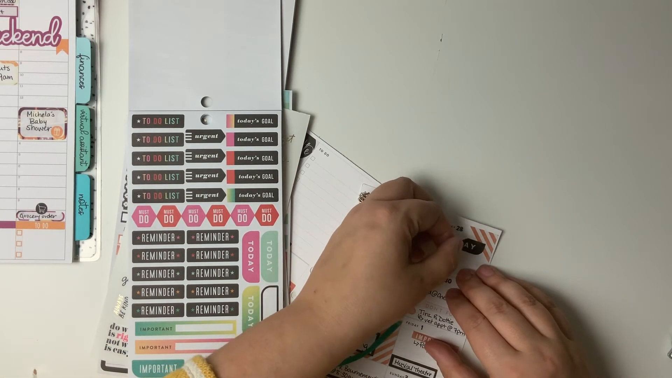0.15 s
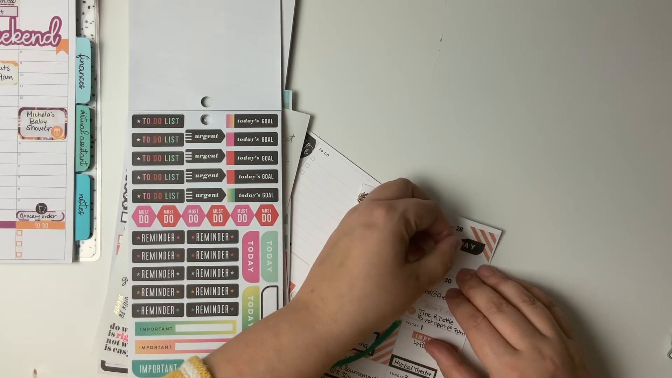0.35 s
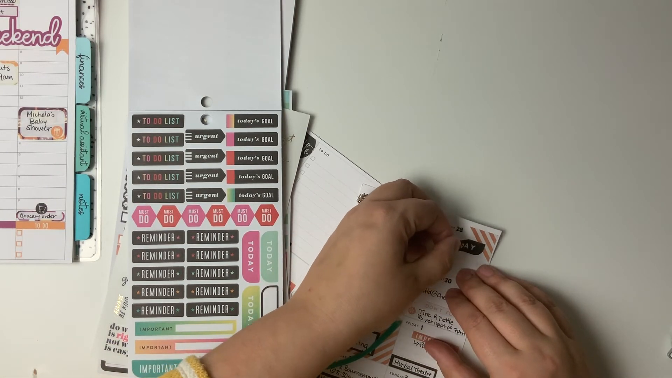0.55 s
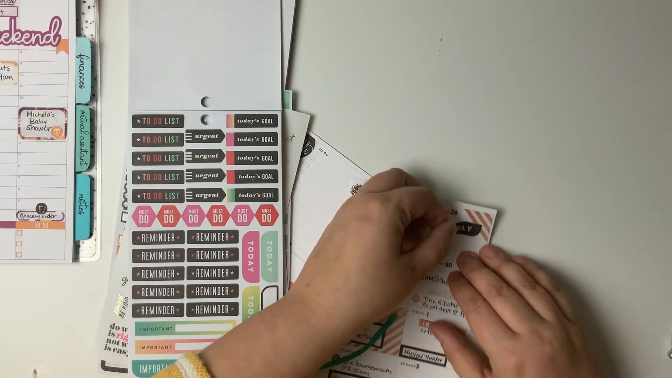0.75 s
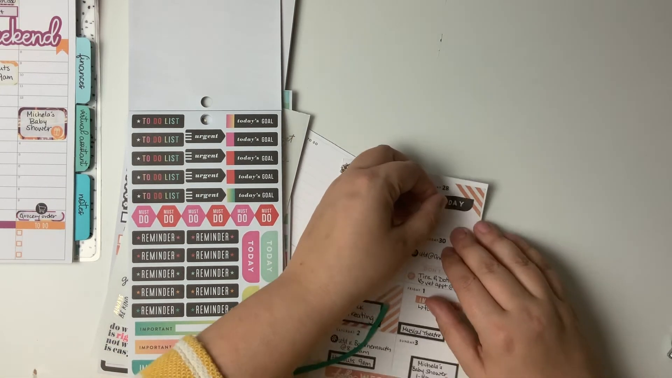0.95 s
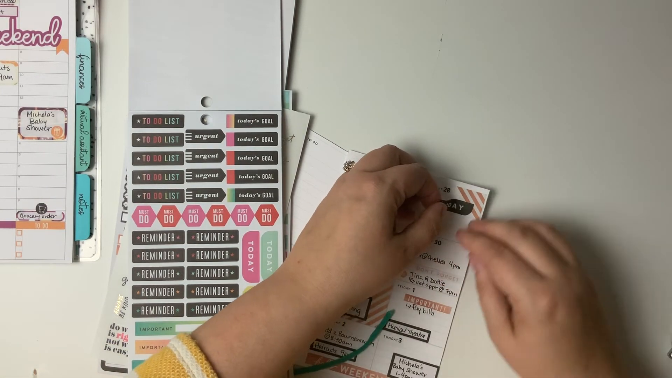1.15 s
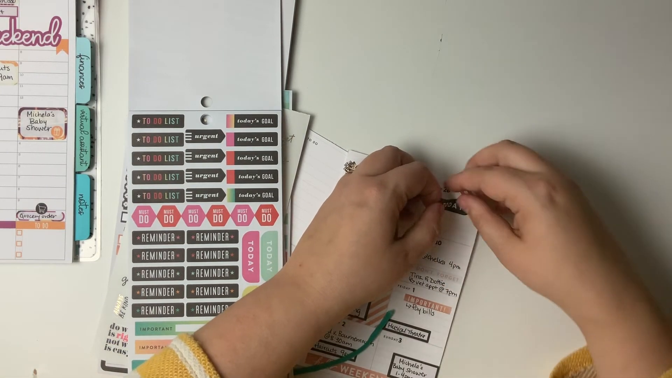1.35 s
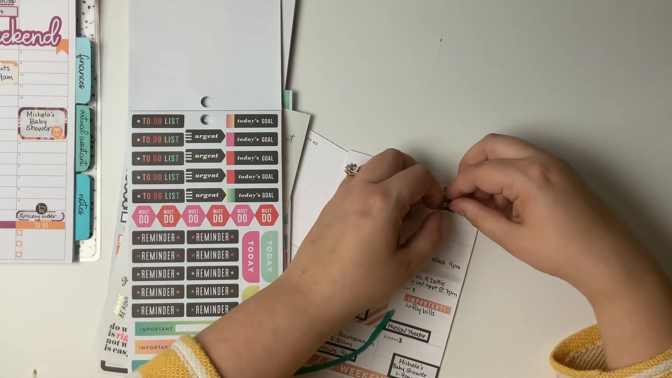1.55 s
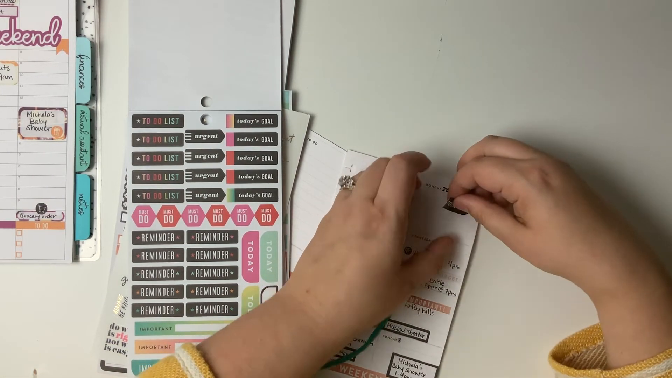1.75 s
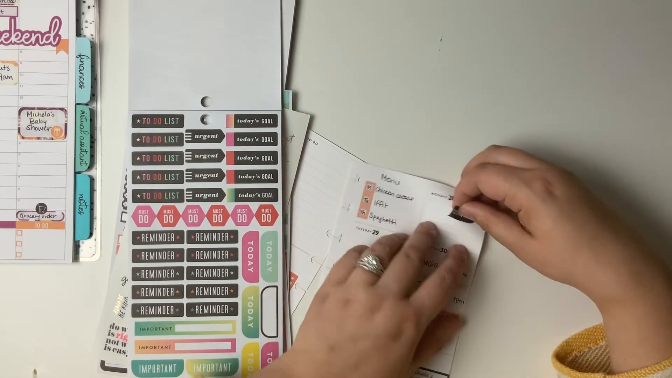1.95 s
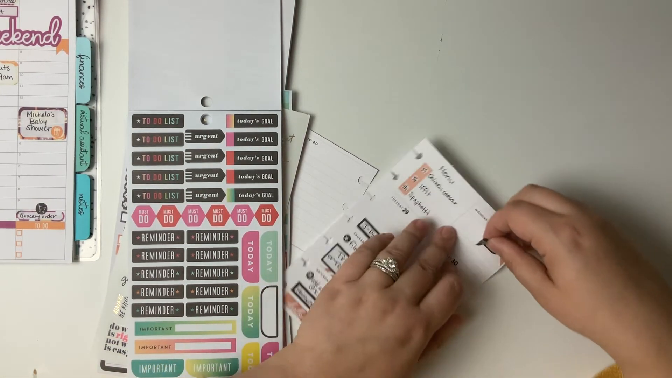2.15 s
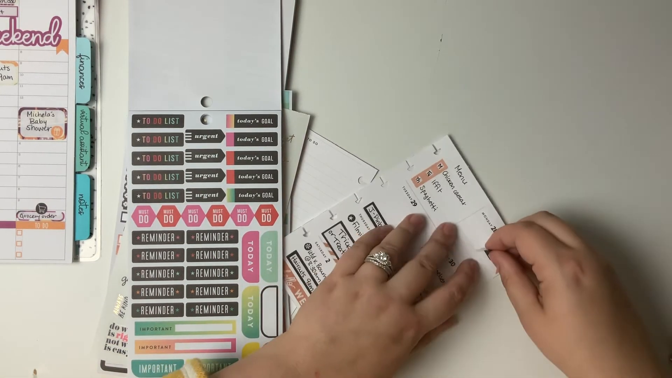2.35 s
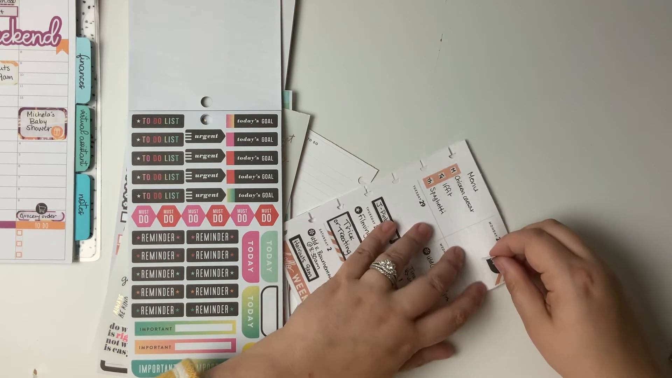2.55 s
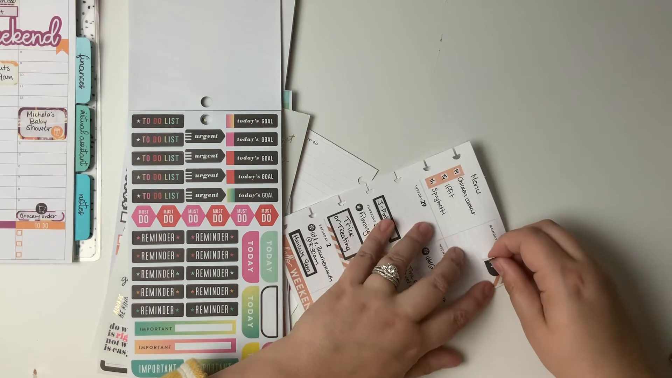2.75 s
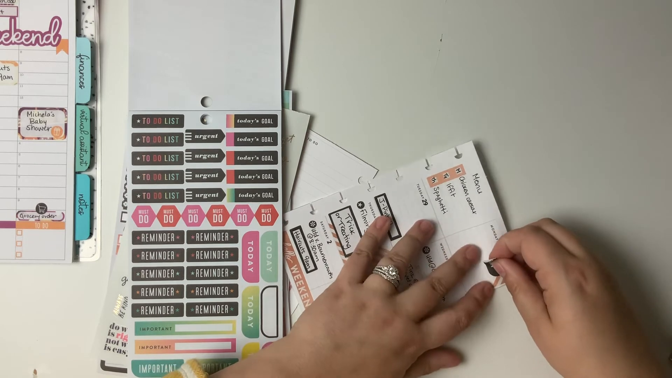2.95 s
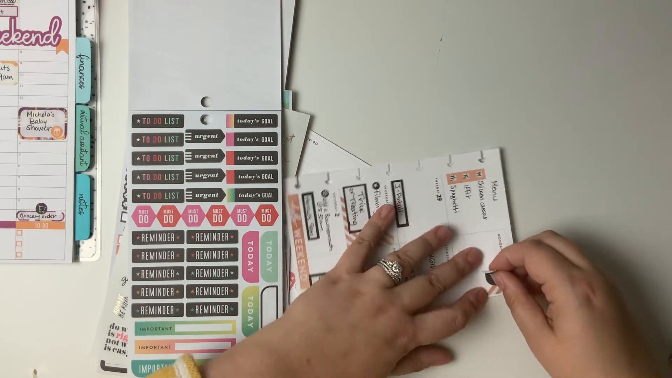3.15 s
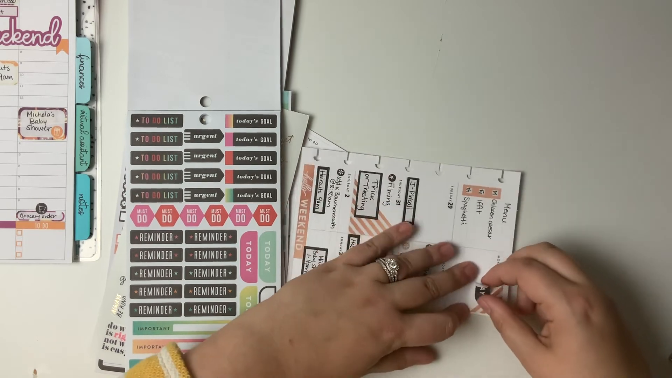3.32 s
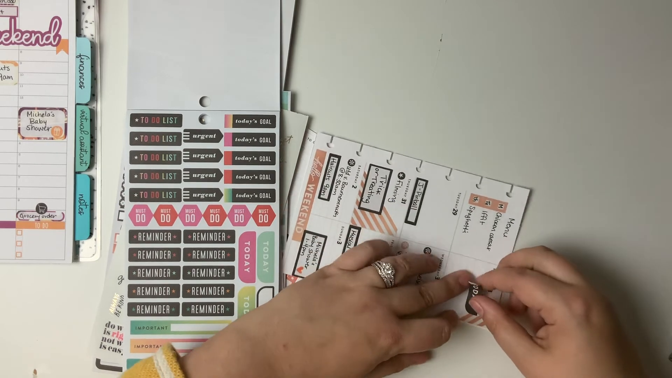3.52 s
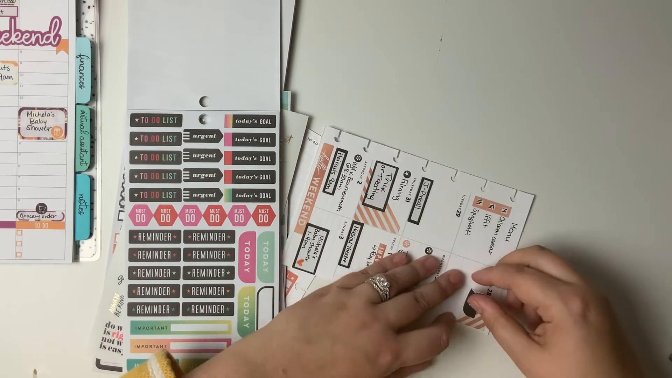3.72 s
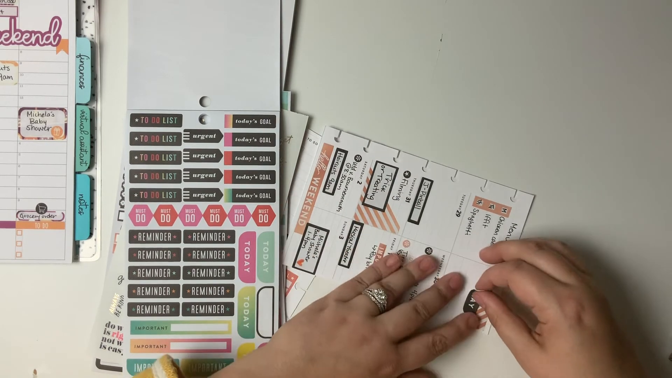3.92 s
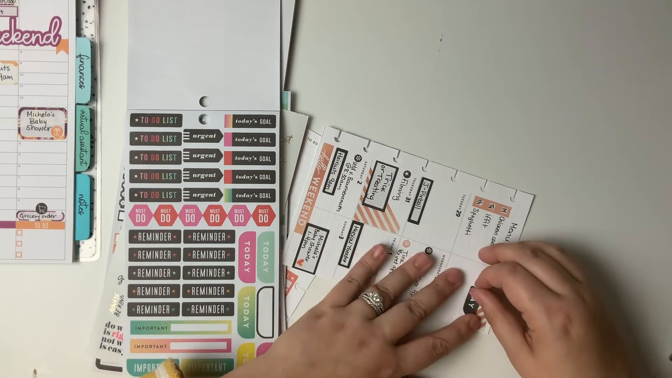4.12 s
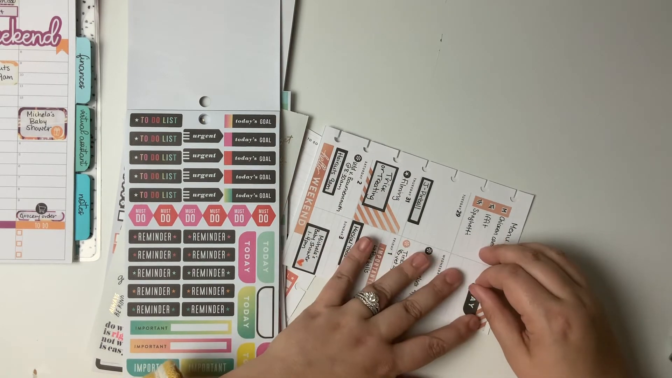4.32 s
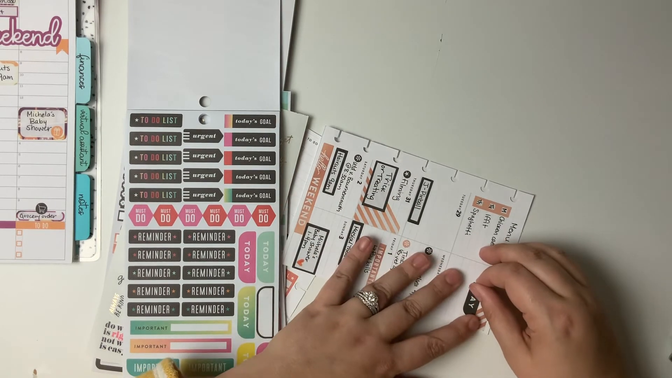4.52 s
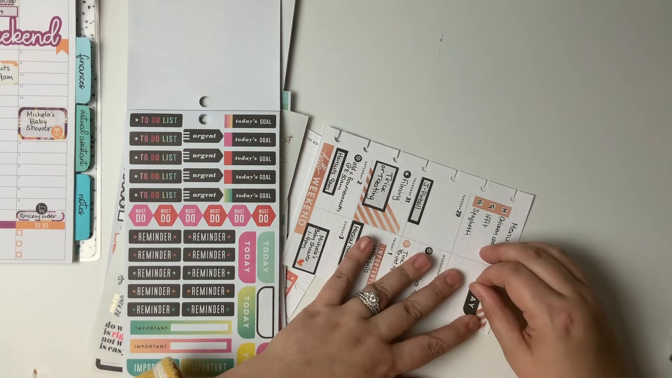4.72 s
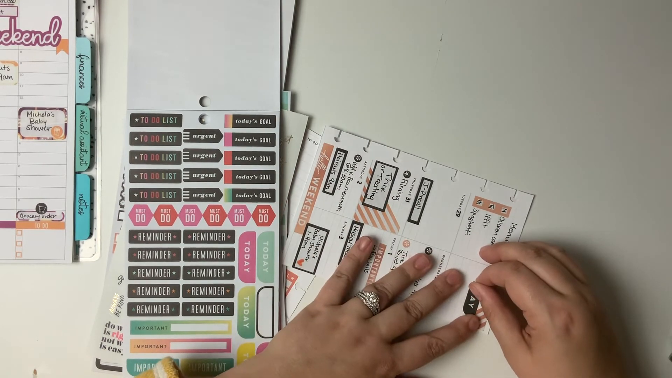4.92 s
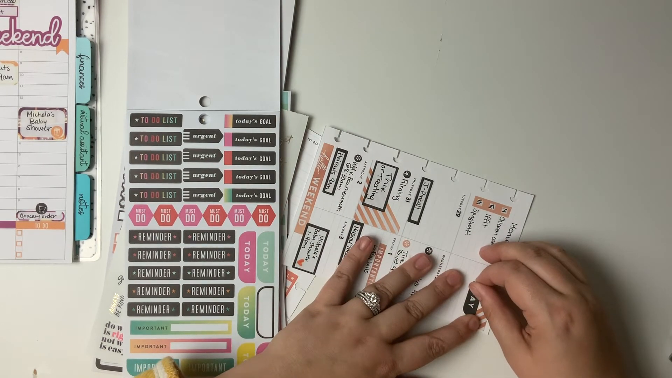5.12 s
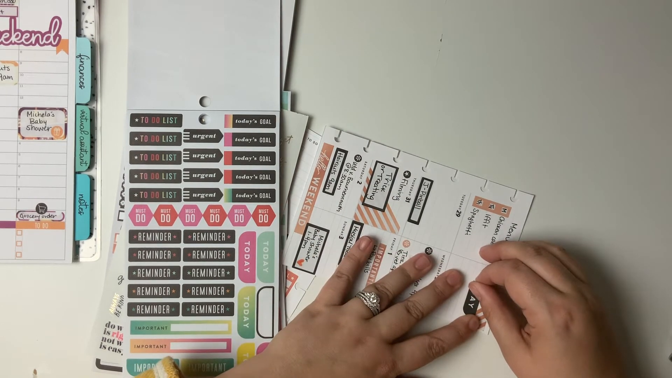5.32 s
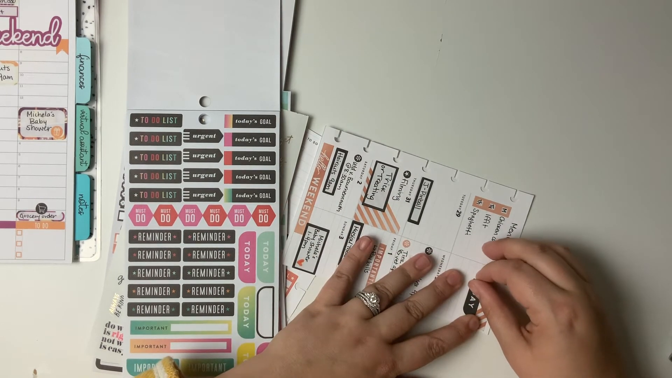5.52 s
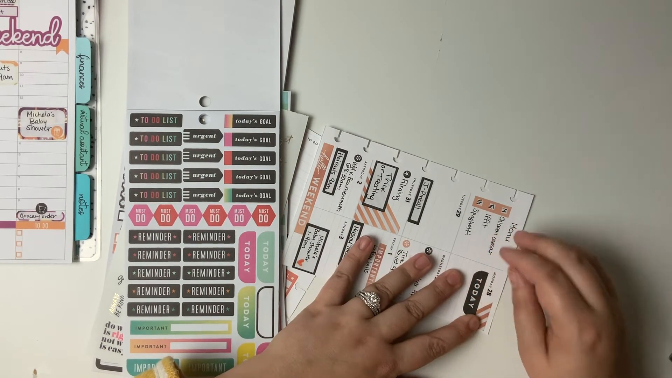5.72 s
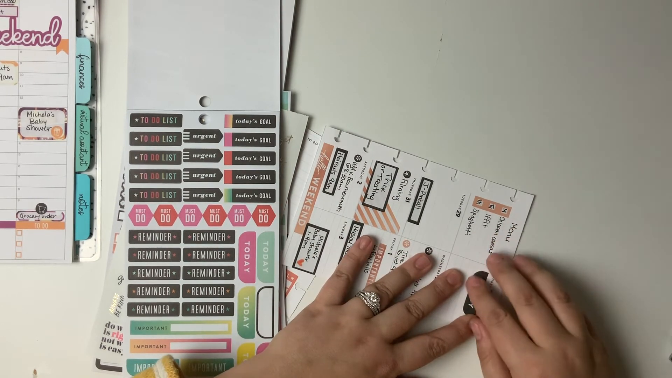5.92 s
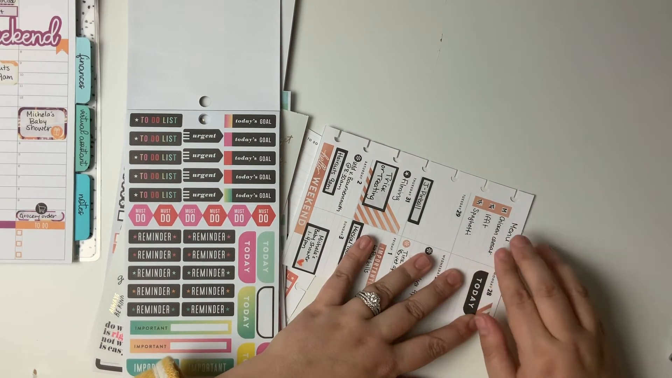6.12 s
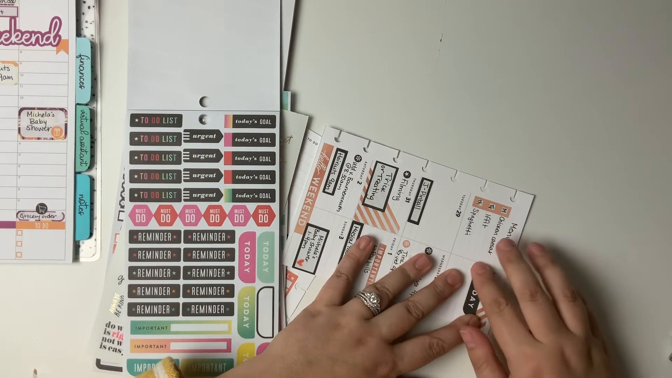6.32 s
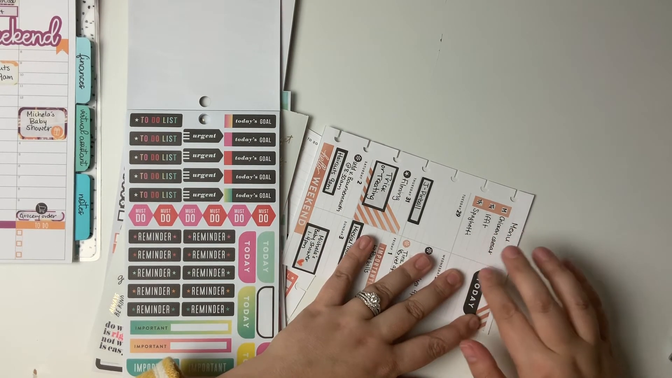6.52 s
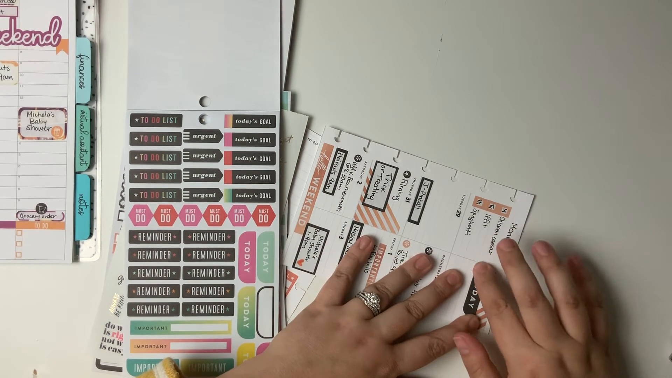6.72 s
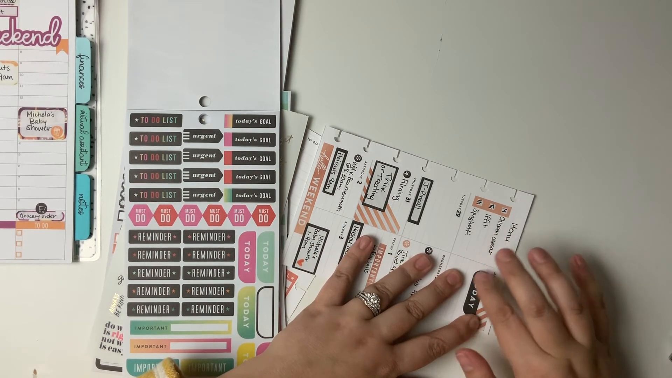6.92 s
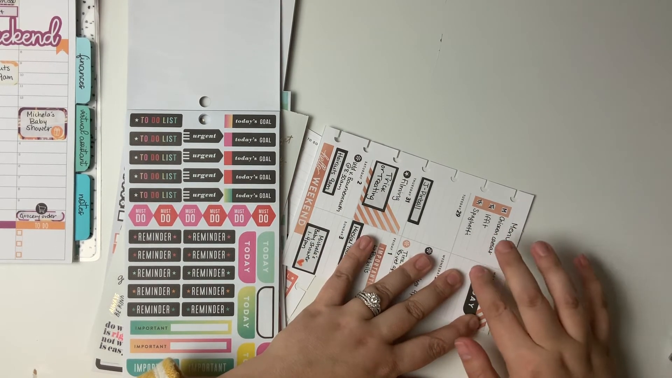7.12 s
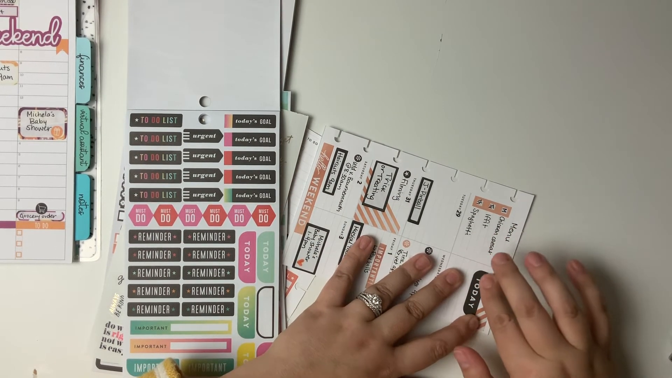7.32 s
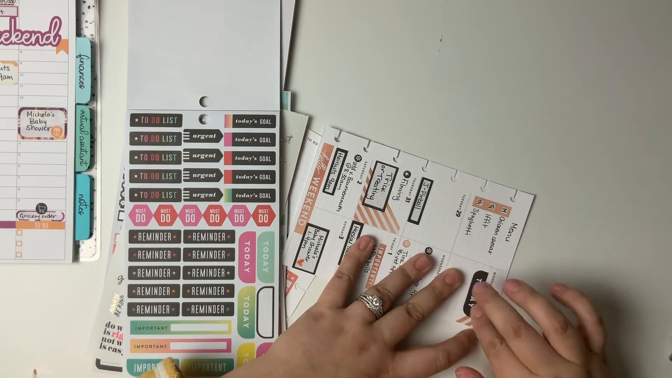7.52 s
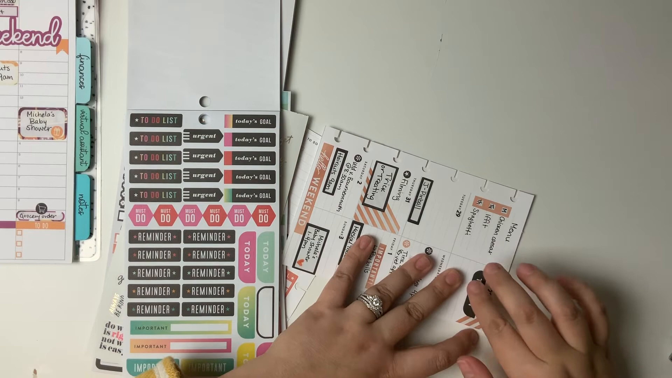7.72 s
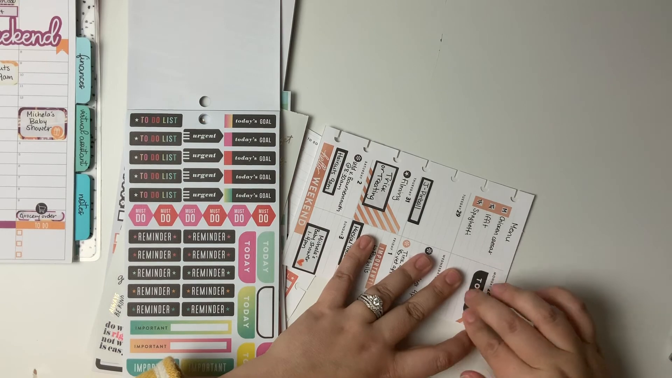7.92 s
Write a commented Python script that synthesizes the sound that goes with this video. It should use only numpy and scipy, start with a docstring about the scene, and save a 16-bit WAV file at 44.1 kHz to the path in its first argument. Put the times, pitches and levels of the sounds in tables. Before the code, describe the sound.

After almost half a second of only low room rumble, thin paper scrapes and rustles, ticking at its edges, then flops onto a desk with a sharp, loud crack. Several short shuffles follow, ending in a crisp tick. Quiet follows, with faint skin brushing; then a click and irregular soft finger thuds with light knocks and small scuffs. Dry, close stereo pickup in a small room.

```python
"""Sticker on a planner page

A planner page slides from under sticker sheets, flops onto a desk and is turned around (hissing noise).
Fingertips then pat and smooth a sticker onto it: filtered noise for skin, clicks for thuds and knocks.
Paper edges snap as sharp ticks with a papery rattle; the desk rings and sways under the pats.
Short swells of noise, low or broad, join in.
A small room with a low rumble and hum, heard through a camera's two microphone ports."""
import sys
import numpy as np
from scipy import signal
from scipy.fft import rfft, irfft
from scipy.io import wavfile
from scipy.ndimage import map_coordinates

SR = 44100
rng = np.random.default_rng(int(sys.argv[2]) if len(sys.argv) > 2 else 0)


def generate_wav(sig):
    """Save sig (samples, or channels by samples) to the path in sys.argv[1] as 16-bit PCM at SR."""
    pcm = np.round(np.clip(np.atleast_2d(sig).T, -1, 1) * 32767).astype(np.int16)
    wavfile.write(sys.argv[1], SR, pcm)


N = 355446
TIME = np.arange(N) / SR  # seconds

# pushes of the page: start t/s, length/s, fastest at share of length, hiss level/dB,
# flutter of the sheet level/dB, sheet resonance f/Hz, drag on the desk level/dB
PAGE_PUSHES = [(0.483, 0.13, .4, -57.5, -75, 4650, -81), (0.697, 0.27, 0.24, -31.5, -44.5, 4950, -52.5),
               (0.993, 0.1, 0.55, -38, -71, 5200, -55), (1.117, .05, 0.42, -40.5, -76, 5000, -58),
               (1.146, 0.21, 0.21, -55, -62.5, 4300, -54.5), (1.351, 0.15, 0.22, -45, -47.5, 4800, -62.5),
               (1.552, 0.038, 0.42, -45.5, -53, 4300, -44.5), (1.718, 0.17, 0.084, -41, -53, 3570, -54.5),
               (1.869, 0.14, 0.7, -41, -38.5, 3600, -54), (1.951, 0.27, .42, -26.5, -34.5, 3400, -48),
               (2.245, 0.16, 0.2, -33.5, -54.5, 3400, -57.5), (2.414, .27, 0.41, -37, -47, 4000, -53),
               (2.781, 0.1, 0.45, -42.5, -51, 3900, -67), (2.956, 0.12, 0.63, -43.5, -49, 4040, -44.5),
               (3.056, .23, 0.41, -34, -47.5, 4400, -53.5), (3.276, 0.12, 0.27, -36.5, -46.5, 5300, -47),
               (3.36, 0.21, 0.19, -41, -59, 5400, -58.5), (3.576, 0.079, 0.29, -42, -59, 5000, -55),
               (3.651, 0.093, 0.14, -48, -73, 5400, -65)]
# fingers brushing the page and smoothing the sticker: start t/s, length/s,
# fastest at share of length, hiss level/dB, drag on the desk level/dB
FINGER_RUBS = [(3.799, .15, .55, -39.5, -77), (4.058, 0.17, .45, -46, -87), (4.239, .1, 0.48, -48.5, -82),
               (5.549, 0.17, .5, -38.5, -44.5), (5.739, 0.18, 0.94, -38.5, -63),
               (5.948, 0.11, 0.34, -39.5, -49), (6.314, 0.16, 0.24, -46, -55.5),
               (7.369, 0.078, 0.77, -40, -40.5), (7.443, 0.18, 0.71, -43, -48.5),
               (7.806, 0.24, 0.28, -40.5, -55)]
# short swells of noise, low or broad: t/s, level/dB, half length/s, resonance f/Hz, width/Hz
SWELLS = [(0.709, -37.5, 0.013, 262, 296), (0.806, -47.5, 0.064, 2410, 810), (1.615, -40, 0.033, 216, 262),
          (5.605, -34, 0.037, 186, 132), (5.604, -36, 0.0093, 531, 696), (5.853, -43.5, 0.056, 3750, 4800),
          (6.679, -34, 0.011, 630, 280), (6.706, -30, 0.0099, 487, 240), (7.075, -32, 0.0078, 497, 257),
          (7.1, -38.5, 0.019, 437, 146), (7.901, -48, 0.046, 2220, 1300)]
# edges and nails snapping: t/s, tick peak level/dB, papery body relative to the tick/dB,
# run-up of smaller ticks/s
EDGE_SNAPS = [(0.1732, -44.5, -4, 0), (0.4991, -40.5, 1.5, 0.0073), (0.6974, -31.5, 4.5, 0.00068),
              (1.062, -21, -23, 0.0077), (1.3483, -33, -14, 0.0052), (1.5564, -27.5, -3, 0.0048),
              (1.754, -14.5, 0, 0.02), (1.9445, -32, 2.5, 0.0044), (2.0782, -7.5, -4, 0.021),
              (2.114, -13.5, -1.5, 0), (2.665, -23.5, -13, 0.0036), (2.9716, -32.5, -4, 0.015),
              (3.5755, -10, -20.5, 0.0045), (3.5813, -19, -15.5, 0.0013), (4.184, -32.5, -31, 0),
              (5.269, -45, -3, 0.0071), (5.485, -33, -6.5, 0.0048), (5.5363, -33, -2.5, 0.0046),
              (5.6282, -12.5, -17.5, 0.0058), (8.0514, -29.5, -10.5, 0)]
# fingertips landing: t/s, thud level/dB, knock level/dB, skin scuff level/dB
FINGER_PATS = [(0.697, -46, -38, -67), (1.085, -42, -40, -45.5), (1.553, -36.5, -52, -67),
               (1.604, -43, -41, -75), (2.99, -35.5, -36, -38.5), (3.325, -31.5, -26, -54),
               (3.503, -40, -35, -61), (3.615, -41.5, -47.5, -60), (5.486, -30, -38, -54),
               (5.536, -29, -31, -59), (5.957, -24, -41, -61), (6.089, -23, -30, -39),
               (6.323, -22.5, -41, -46), (6.644, -17.5, -41, -42.5), (6.78, -20.5, -29, -45),
               (7.023, -21, -36, -47.5), (7.181, -31.5, -32.5, -43), (7.316, -34.5, -33, -46),
               (7.418, -31.5, -26, -47), (7.818, -41.5, -40, -44), (7.995, -40.5, -36, -46)]
# a fingertip comes unstuck and the desk springs back: t/s, tick peak level/dB, sway level/dB
FINGER_LIFTS = [(5.583, -47, -31.5), (5.894, -25.5, -33), (6.277, -25, -28.5), (6.5856, -38, -44),
                (6.986, -40, -44), (7.418, -23, -40), (7.7779, -31.5, -35)]
# the page flopping down: t/s, peak level/dB
PAGE_FLOPS = [(2.057, -20), (2.072, -11.5), (2.0784, 0.5), (2.088, -13.5)]

# tone colours of rubbed and crumpled paper: f/Hz, relative level/dB
PAPER_HISS = [(1500, -34), (3000, -13), (5000, -3.5), (6500, -3), (7800, 2), (9200, 0.5), (10500, 1.5),
              (12200, 1.5), (14000, 4.5), (16000, -6)]
PAGE_DRAG = [(100, -14.5), (300, 0), (700, -3), (1100, -4.5), (1700, -6.5), (2300, -9), (3000, -5.5),
             (5000, -41), (9000, -53)]
SKIN_HISS = [(1500, -5), (3000, -42), (5000, -3.5), (7000, -14.5), (9000, -3.5), (10500, -0.5), (13000, 2),
             (16000, 5)]
FINGER_DRAG = [(100, -10), (300, -0.5), (650, -0.5), (1000, -10), (1600, -11), (2200, -8.5), (2600, -9),
               (3300, -11.5), (5000, -26), (9000, -48)]
CRUMPLE_COLOUR = [(70, -12), (170, -0.5), (280, -2), (440, 3), (600, -3.5), (800, -8), (1250, 3.5),
                  (1600, -14.5), (2300, -3.5), (3000, -14.5), (6000, -20.5), (12000, -45.5)]
# tone colours of short clicks: f/Hz, relative level/dB
TICK_COLOUR = [(1000, -32.5), (4000, -8.5), (6000, -5.5), (9000, -4.5), (12500, -1.5), (16000, 0)]
SNAP_BODY_COLOUR = [(300, -21.5), (900, -4), (2000, -7.5), (3000, 0.5), (4500, 0), (6000, 1), (9000, -14),
                    (16000, -43.5)]
THUD_COLOUR = [(40, -11), (170, 2), (300, -5.5), (500, 4), (780, -6.5), (1000, -4), (1600, -16),
               (2400, -41), (4000, -29)]
KNOCK_COLOUR = [(200, -23), (700, -11), (1250, 7.5), (1700, -1.5), (2250, 3), (3000, -19), (5000, -21),
                (10000, -31)]
FLOP_COLOUR = [(50, -31.5), (140, -3.5), (400, -6.5), (600, -6), (800, 3), (1200, 0), (1500, -5),
               (2300, -11.5), (4000, -39), (9000, -34)]

# the spot under the finger gives way: f/Hz before each pat shifts it, relative level/dB, time to fall 60 dB/s
FINGERTIP_MODES = [(297, 1, 0.031), (538, -4, 0.023), (704.7, -0.5, 0.053)]
# what the desk rings with: f/Hz, relative level/dB, time to fall 60 dB/s (before the cap in ringing)
DESK_MODES = [(161, 8, 0.16), (288, -12, 0.37), (443, 17.5, .3), (500, -3.5, .1), (732, -5, .2),
              (865, -7.5, .2), (1083, -1.5, .25), (1280, -8, 0.23), (1275, -2, .25), (1630, -1, .25),
              (1873, -3, .22), (2300, -5.5, .25)]
# how long the room's tail lasts: f/Hz, time to fall 60 dB/s
ROOM_DECAY = [(100, 0.45), (500, 0.29), (1500, 0.21), (5000, 0.14), (15000, 0.07)]

# tone colour of the background air: f/Hz, relative level/dB
RUMBLE_COLOUR = [(12, -44.5), (20, -9), (138, 0), (204, -13.5), (293, -10.5), (410, -25), (446, -9),
                 (485, -26), (527, -23.5), (738, -33.5), (923, -32.5), (1710, -41.5), (2140, -39),
                 (5680, -42.5), (16000, -43)]
# slow swell of its low part: t/s, level/dB
LOW_SWELL = [(0.0, 1), (1.15, 1), (1.799, -2.5), (3.2, -2), (4.9, -4), (5.25, 2), (6.4, 1), (8.06, -1)]
# humming tones: f/Hz, level/dB
HUM_TONES = [(134.6, -58), (290.7, -69), (360.7, -74), (446.8, -71.5)]

# how much the ports differ: f/Hz, unshared part level/dB
PORT_WIDTH = [(50, -21), (200, -6), (450, -5.5), (900, 5.5), (2000, -3.5), (2800, -8.5), (3900, -3),
              (5000, -1.5), (8200, -2.5), (9600, -11.5), (15000, -24)]
# left port against right: f/Hz, level difference/dB
PORT_BALANCE = [(50, -2), (200, -3), (400, -3), (700, -1.5), (1200, 0), (5000, 0.5), (8800, 2.5),
                (10500, 0.5)]
# lag of the right port: f/Hz, phase/radians
PORT_LAG = [(0, 0), (500, 0), (1400, 3.1), (2800, 9.4), (3800, 15.7), (7600, 34.6), (9200, 37.7),
            (15100, 50.3), (17000, 52)]

# every push or rub grips, speeds up and slows along one arch, and lets go
GRIP_S, ARCH_DB, LET_GO_S = 0.012, 8.5, 0.026
CREEP_DB, CREEP_S = -19.5, 0.015  # the paper stirs just before it moves
# the page crumples as it lands: a quick rise, a sagging hold, a release
CRUSH_START_S, CRUSH_DB, CRUSH_RISE_S, CRUSH_HOLD_S = 2.048, -21, 0.0054, 0.064
CRUSH_SAG_DB_PER_S, CRUSH_RELEASE_S = 93, 0.04
RUN_UP_GAP_S, RUN_UP_STEP_DB = 0.0043, 4  # each run-up tick is this much louder than the one before
LIFT_BODY_DB = -15.5  # papery body relative to the tick
PAT_SWAY_DB, SWAY_DELAY_S = -13.5, 0.0037  # sway relative to the thud; lag of the desk behind the finger
RUMBLE_DB = -46.5
EDGE_HZ = 15900  # upper limit of what the ports pass on


def sliding_page():
    """Paper hisses over paper, the bending sheet sings broadly, and the desk takes up the drag."""
    hiss_db, sheet_db, sheet_hz, drag_db = np.transpose(PAGE_PUSHES)[3:]
    pushes = np.array([gesture(*row[:3]) for row in PAGE_PUSHES])
    slips = friction(grains_per_s=900, spread_db=3.2, grain_db=-6.5, uneven_db=1.0)
    # the strongest push of the moment decides most of the sheet's pitch
    weight = pushes + 1e-12
    hz = sheet_hz @ weight / weight.sum(0)
    sheet = resonate(slips, hz, width=2300)
    sheet = evened(resonate(sheet, hz, width=2300))
    hiss = together(pushes, hiss_db) * tinted(slips, PAPER_HISS)
    flutter = together(pushes, sheet_db) * sheet
    drag = together(pushes, drag_db) * tinted(slips, PAGE_DRAG)
    return hiss + flutter + drag


def crumple():
    """Air is squeezed out under the landing page while it buckles: a burst of flickering noise."""
    cracks = rng.standard_normal((2, N)) * amp(0.81 * wander(200))
    t = np.maximum(TIME - CRUSH_START_S, 0)
    rise = np.minimum(t / CRUSH_RISE_S, 1)
    hold = amp(CRUSH_DB - CRUSH_SAG_DB_PER_S * t)
    release = np.exp(-np.maximum(t - CRUSH_HOLD_S, 0) / CRUSH_RELEASE_S)
    return rise * hold * release * tinted(cracks, CRUMPLE_COLOUR)


def smoothing_fingers():
    """Skin rubs the sticker in long strokes, and scuffs briefly after every pat."""
    hiss_db, drag_db = np.transpose(FINGER_RUBS)[3:]
    rubs = np.array([gesture(*row[:3]) for row in FINGER_RUBS])
    slips = friction(grains_per_s=330, spread_db=-4, grain_db=-18.0, uneven_db=2.5)
    t, scuffs = np.arange(SR // 4) / SR, np.zeros(N)
    scuff = (1 - np.exp(-t / 0.0012)) / np.sqrt(1 + (t / 0.043) ** 6)
    for start, _, _, scuff_db in FINGER_PATS:
        add(scuffs, start, amp(scuff_db) * scuff)
    # rubs and scuffs add in power
    hiss = np.hypot(together(rubs, hiss_db), scuffs)
    drag = np.hypot(together(rubs, drag_db), amp(-8.0) * scuffs)
    return hiss * tinted(slips, SKIN_HISS) + drag * tinted(slips, FINGER_DRAG)


def noise_swells(fall):
    """Short swells of noise, low or broad, pass through a resonance that sinks slightly."""
    out, t = np.zeros((2, N)), np.arange(-SR // 4, SR // 4) / SR
    for s, db, half_s, hz, width in SWELLS:
        glide = hz * (1 - fall * np.tanh(t / half_s))
        noise = []
        for port in rng.standard_normal((2, len(t))):
            once = resonate(port, glide, width)
            noise.append(resonate(once, glide, width))
        swell = np.exp(-0.5 * (t / half_s) ** 2)
        add(out, s + t[0], amp(db) * evened(np.array(noise)) * swell)
    return out


def snaps(count=6):
    """Edges let go, some after a run-up of growing ticks; fingertips come unstuck with a single tick."""
    out = np.zeros(N)
    for s, db, body_db, run_up_s in EDGE_SNAPS:
        for k in range(count):
            early = k * RUN_UP_GAP_S
            if early <= run_up_s:
                add(out, s - early, amp(db - k * RUN_UP_STEP_DB) * snap(body_db))
    for s, db, _ in FINGER_LIFTS:
        add(out, s, amp(db) * snap(LIFT_BODY_DB))
    return out


def snap(body_db):
    """Paper lets go with one sharp tick and a few milliseconds of rattling fibres."""
    t = np.arange(SR // 40) / SR
    release = 0.52 * rng.standard_normal(len(t)) * np.exp(-t / 0.0022)
    release[0] = 1
    tick = signal.fftconvolve(release, pulse(TICK_COLOUR))
    body = signal.fftconvolve(release, pulse(SNAP_BODY_COLOUR))
    return tick / abs(tick).max() + amp(body_db) * body / abs(body).max()


def blows():
    """Fingertips thud and knock, each on its own spot; the whole page lands in a quick run of slaps."""
    out = np.zeros(N)
    thud, knock, flop = pulse(THUD_COLOUR), pulse(KNOCK_COLOUR), pulse(FLOP_COLOUR)
    # every pat shifts the pitches a little
    spots = rng.uniform(0.915, 1.083, (len(FINGER_PATS), len(FINGERTIP_MODES)))
    for (s, thud_db, knock_db, _), spot in zip(FINGER_PATS, spots):
        modes = [(hz * k, gain, t60) for (hz, gain, t60), k in zip(FINGERTIP_MODES, spot)]
        give = signal.fftconvolve(thud, ringing(modes))
        add(out, s + 0.001966, amp(thud_db) * give / abs(give).max())
        add(out, s + 0.000977, amp(knock_db) * knock)
    for s, db in PAGE_FLOPS:
        add(out, s, amp(db) * flop)
    return out


def desk(x, ring_db):
    """The desk top rings with its own tones after each blow."""
    ring = amp(ring_db) * ringing(DESK_MODES)
    ring[0] += 1  # the blow itself
    return signal.fftconvolve(x, ring)[:N]


def thumps(sway_hz, decay_s):
    """The whole desk sways for a few cycles whenever a finger lands or lifts."""
    out, t = np.zeros(N), np.arange(SR // 4) / SR
    landings = [(s, thud_db + PAT_SWAY_DB) for s, thud_db, _, _ in FINGER_PATS]
    lifts = [(s, sway_db) for s, _, sway_db in FINGER_LIFTS]
    envelope = (1 - np.exp(-t / 0.0022)) * np.exp(-t / decay_s)
    for s, db in landings + lifts:
        hz = sway_hz * rng.uniform(0.676, 1.09)
        sway = np.sin(2 * np.pi * hz * t) + 0.78 * np.sin(2 * np.pi * 1.7 * hz * t)
        add(out, s + SWAY_DELAY_S, amp(db) * sway * envelope)
    return out


def room(x, near_db, wet_db, echo_db):
    """Direct sound, scatter from things close by, one ceiling echo, and a short tail for each port."""
    t = np.arange(SR // 2) / SR
    # the tail is noise that fades at its own pace in each frequency band
    hz, age, z = signal.stft(rng.standard_normal((2, len(t))), SR, nperseg=256)
    fade = amp(-60 * age / read(ROOM_DECAY, hz)[:, None])
    tail = signal.istft(z * fade, SR, nperseg=256)[1][:, :len(t)]
    tail *= 1 - np.exp(-t / 0.0013)
    near = rng.standard_normal((2, len(t))) * np.exp(-t / 0.00095)
    response = amp(wet_db) * tail / np.linalg.norm(tail[0])
    response += amp(near_db) * near / np.linalg.norm(near[0])
    response[:, 0] += 1  # direct sound
    add(response, 0.015, amp(echo_db) * np.ones(1))
    return signal.fftconvolve(x[None], response, axes=1)[:, :N]


def background():
    """Noise makes a low rumble that swells a little and a faint hiss; sines make a wavering hum."""
    s, db = np.transpose(LOW_SWELL)
    air = amp(RUMBLE_DB) * tinted(rng.standard_normal((2, N)), RUMBLE_COLOUR)
    low = signal.sosfiltfilt(signal.butter(2, 450, fs=SR, output="sos"), air)
    swell = amp(np.interp(TIME, s, db))
    hum = np.zeros(N)
    for hz, tone_db in HUM_TONES:
        level = amp(tone_db) * (1 + 0.57 * wander(6.2))
        hum += level * np.sin(2 * np.pi * hz * TIME + 2.0 * wander(5.7))
    return air + (swell - 1) * low + hum


def gesture(start, length, fastest):
    """Gain of one hand movement: it creeps, grips, swells with speed along an arch, and dies away."""
    t = np.maximum(TIME - start, 0)
    fastest = np.clip(fastest, 0.05, 0.95)
    speed = np.sin(np.pi * np.interp(t / length, [0, fastest, 1], [0, 0.5, 1]))
    creep = amp(CREEP_DB) * np.exp(-np.minimum(abs(TIME - start) / CREEP_S, 20))
    grip = 1 - np.exp(-t / GRIP_S)
    let_go = np.exp(-np.clip((t - length) / LET_GO_S, 0, 20))
    return creep + grip * amp(ARCH_DB * (speed - 1)) * let_go


def together(gains, levels_db):
    """Overlapping movements add in power."""
    return np.sqrt(amp(levels_db) ** 2 @ gains ** 2)


def friction(grains_per_s, spread_db, grain_db, uneven_db):
    """Countless fibre slips blur into hiss; scattered single grains crackle; the pressure is uneven."""
    sizes = amp(spread_db * np.minimum(rng.exponential(1, N), 4)) * rng.standard_normal(N)
    grains = evened(sizes * (rng.random(N) < grains_per_s / SR))
    rubbing = rng.standard_normal((2, N)) + amp(grain_db) * grains
    return glanced(rubbing) * amp(uneven_db * wander(47))


def glanced(x):
    """Hands and desk mirror the rubbing; the short paths drift, so peaks and notches glide in the hiss."""
    at, out = np.arange(N), x.copy()
    for path_s, share in [(0.00045, 0.3), (0.0011, 0.35), (0.0027, 0.35), (0.0061, 0.3)]:
        late = path_s * SR * (1 + 0.035 * wander(1.5))  # in samples
        out += share * np.array([map_coordinates(port, [at - late], order=1) for port in x])
    return evened(out)


def resonate(x, hz, width):
    """A resonance that follows the curve hz: shift it down to zero, smooth, shift back up."""
    turn = np.exp(2j * np.pi * np.cumsum(hz) / SR)
    r = np.exp(-np.pi * width / SR)
    return 2 * (turn * signal.lfilter([1 - r], [1, -r], x / turn)).real


def ringing(modes):
    """Dying tones of a struck object; paper and hands damp every one quickly."""
    t, out = np.arange(SR // 2) / SR, 0
    for hz, db, t60 in modes:
        fade = amp(db - 60 * t / min(t60, 0.24))  # no tone lasts longer than this cap
        out = out + fade * np.cos(2 * np.pi * hz * t)
    return out


def pulse(spectrum, size=2048):
    """The shortest click with this spectrum that starts at once (minimum phase), peak 1."""
    log_gain = np.log(amp(read(spectrum, abs(np.fft.fftfreq(size, 1 / SR)))))
    click = np.fft.ifft(np.exp(np.conj(signal.hilbert(log_gain)))).real[:size // 2]
    return click / abs(click).max()


def wander(hz):
    """Slow random drift of unit size with changes up to about hz."""
    return tinted(rng.standard_normal(N), [(hz / 2, 0), (hz, -6), (hz * 2, -40), (hz * 10, -120)])


def tinted(x, spectrum):
    """Filters x by a spectrum and gives it unit power."""
    gain = amp(read(spectrum, np.fft.rfftfreq(N, 1 / SR)))
    return evened(irfft(rfft(x) * gain, N))


def read(points, hz):
    """Joins (Hz, value) points on a log-frequency axis."""
    f, value = np.transpose(points)
    return np.interp(np.log(hz + 1), np.log(f + 1), value)


def amp(db):
    """Turns decibels into a plain gain."""
    return 10 ** (np.asarray(db) / 20)


def evened(x):
    """Scales x to unit power."""
    return x / np.sqrt(np.mean(x ** 2) + 1e-20)


def add(mix, s, sound):
    """Mixes a sound in at time s, cut off at the end of the mix."""
    part = mix[..., max(round(s * SR), 0):][..., :sound.shape[-1]]
    part += sound[..., :part.shape[-1]]


def scene():
    """Rubbing, crumpling and noise swells are heard dry; ticks and knocks set off the room."""
    rubbing = sliding_page() + crumple() + smoothing_fingers()
    swells = noise_swells(fall=0.063)
    ticks = room(snaps(), near_db=2.0, wet_db=-2, echo_db=-18)
    struck = desk(blows(), ring_db=-55)
    knocks = room(struck, near_db=-7, wet_db=-6, echo_db=-11)
    right_of_centre = amp([[-2], [2]])  # left, right
    sway = thumps(sway_hz=55.3, decay_s=0.021)
    return rubbing + swells + ticks + right_of_centre * knocks + sway + background()


def record(dry):
    """Two ports share most of the bass and top treble; the right one hears later; then the band limit."""
    hz = np.fft.rfftfreq(N, 1 / SR)
    first, second = rfft(dry)
    width = amp(read(PORT_WIDTH, hz))
    shared = (first + second) / np.sqrt(2)
    apart = width * (first - second) / np.sqrt(2)
    lean = amp(read(PORT_BALANCE, hz) / 2)
    lag = np.exp(-1j * np.interp(hz, *np.transpose(PORT_LAG)))
    left = (shared + apart) * lean
    right = (shared - apart) * lag / lean
    ports = irfft(np.array([left, right]) / np.sqrt(1 + width ** 2), N)
    clipped = np.clip(ports, -0.9, 0.9)  # peaks higher than this are flattened
    band_limit = signal.firwin(301, EDGE_HZ, window=("kaiser", 7), fs=SR)
    return signal.oaconvolve(clipped, band_limit[None], "same")


dry = scene()
out = record(dry)
generate_wav(out)
```